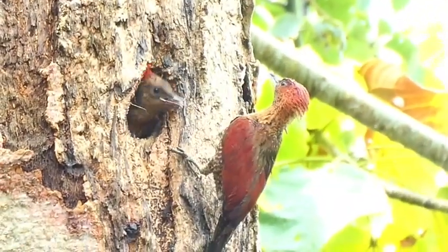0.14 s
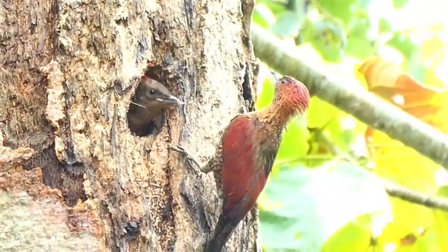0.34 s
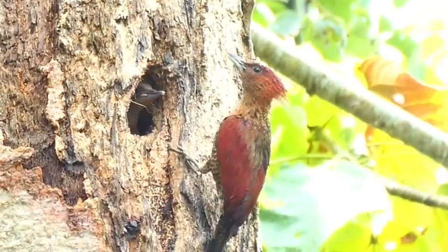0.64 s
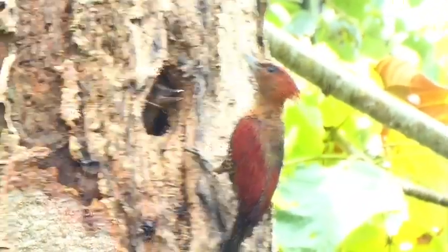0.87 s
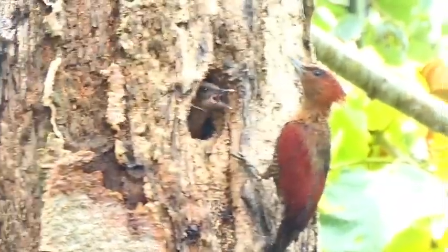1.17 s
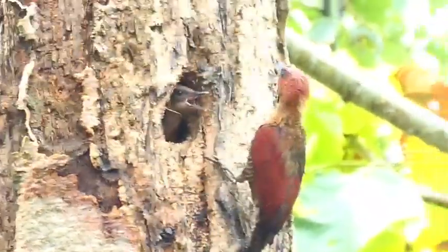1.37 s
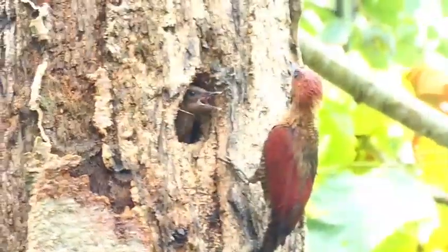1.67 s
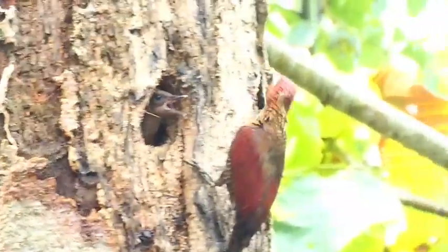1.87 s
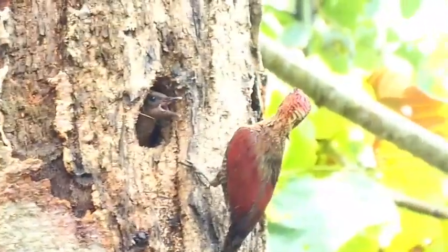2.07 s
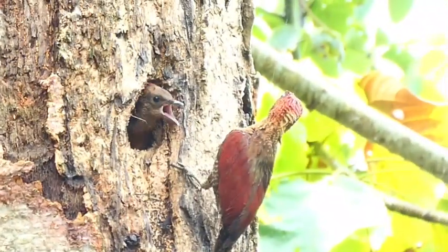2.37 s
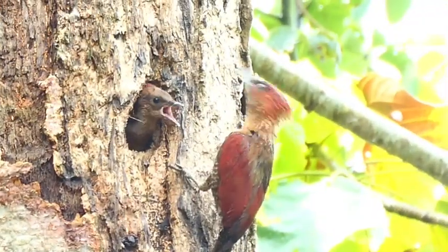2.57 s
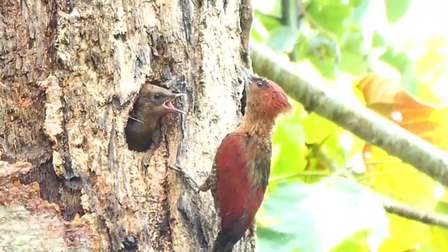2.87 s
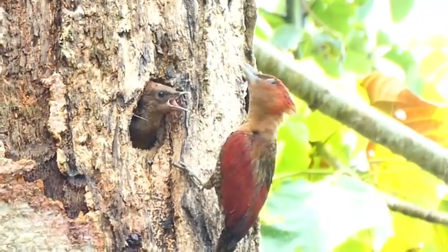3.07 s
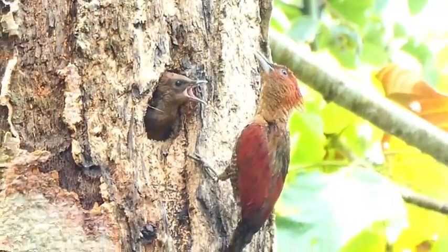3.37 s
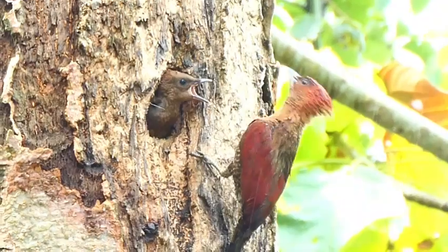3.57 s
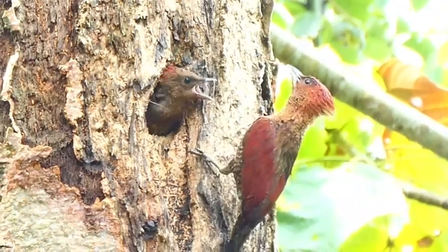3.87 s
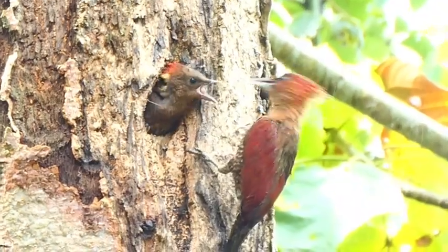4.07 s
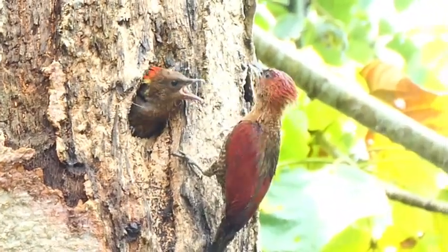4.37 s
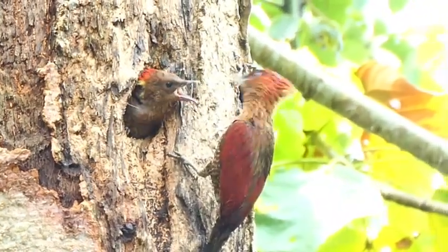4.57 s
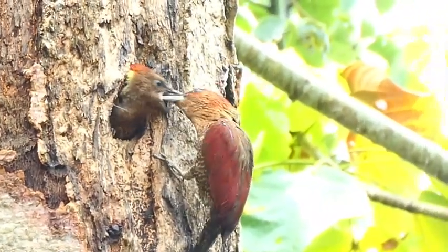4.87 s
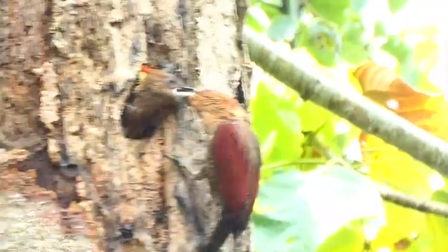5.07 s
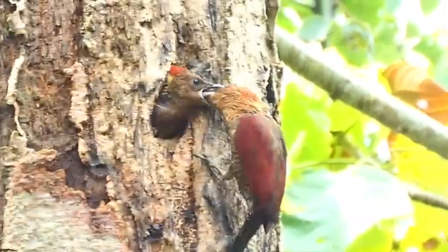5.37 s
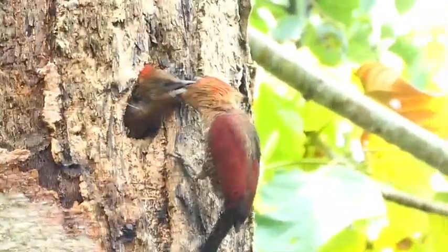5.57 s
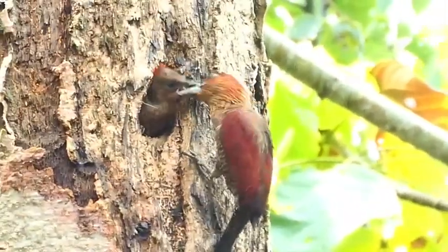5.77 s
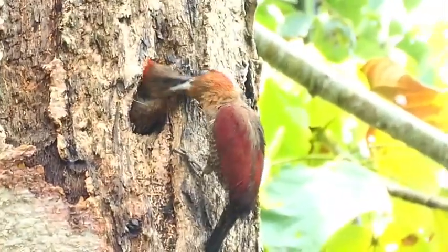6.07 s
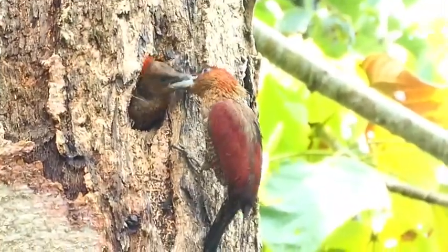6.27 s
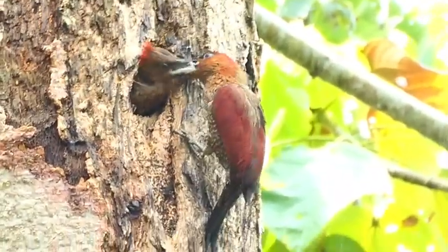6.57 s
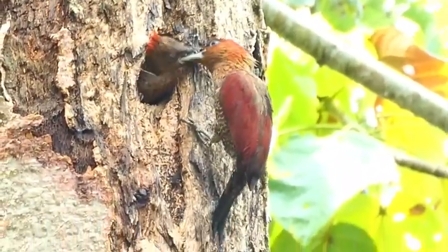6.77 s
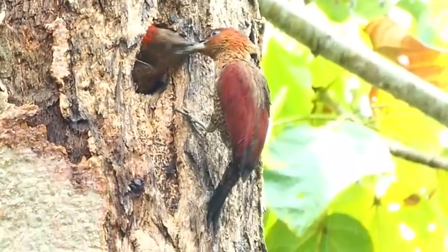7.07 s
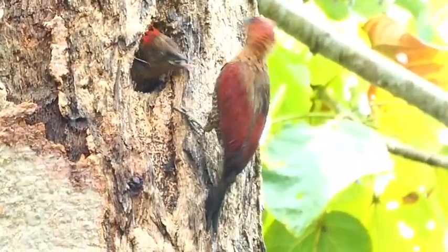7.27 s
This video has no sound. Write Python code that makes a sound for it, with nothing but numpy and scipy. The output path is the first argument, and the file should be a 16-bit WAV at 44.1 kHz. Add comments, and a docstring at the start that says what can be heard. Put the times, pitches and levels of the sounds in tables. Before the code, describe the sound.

Outdoors among trees, a small camera microphone catches a nestling's insistent begging: buzzy, breathy rasps with short clear squeaks, about five per second. Irregular plastic ticks and several bursts of quick gear-like knocking sit very close and dry over the calls. Near the end, the chick is muffled into quicker, rougher rasps and then faint scraps, leaving handling clicks, rattling, soft woodland hum and hiss.

```python
"""A woodpecker nestling begs from its hole: each call is a swelling rasp that often breaks into a clear squeak.
The rasp is noise shaped by throat resonances; the squeak is a gliding tone with overtones.
A camera's focus drive rattles in bursts and its shell ticks, both made of short ringing modes.
Behind them lie echoes from trees, a few soft gliding notes, hum, hiss and a thin insect line, all noise or tones.
The small microphone has a narrow notch and a deep valley in the treble."""
import sys
import numpy as np
from scipy import signal
from scipy.fft import rfft, irfft, next_fast_len
from scipy.io import wavfile
from scipy.ndimage import uniform_filter1d, map_coordinates

SR = 44100
rng = np.random.default_rng(int(sys.argv[2]) if len(sys.argv) > 2 else 0)


def waveform_to_disk(signal):
    """Save audio, clipped to [-1, 1], as 16-bit WAV at the path in sys.argv[1]."""
    frames = np.transpose(np.atleast_2d(signal))
    scaled = np.clip(frames, -1, 1) * 32767
    samples = np.round(scaled).astype(np.int16)
    wavfile.write(sys.argv[1], SR, samples)


N = 327663

# begging calls: peak_s, swell_s, fade_s, rasp_db, sizzle_db
BEGGING_CALLS = [(.045, 0.052, 0.061, -44, -47.5), (.26, 0.13, 0.058, -40.5, -48.5),
                 (0.516, 0.1, 0.043, -30, -39.5), (.665, 0.094, 0.044, -42.5, -42.5),
                 (.89, .12, .05, -35, -37), (1.05, 0.11, 0.048, -40, -42.5),
                 (1.275, 0.15, 0.053, -35.5, -41.5), (1.435, 0.11, 0.06, -33.5, -39),
                 (1.665, .12, 0.058, -33.5, -39), (1.825, 0.11, 0.055, -36.5, -40.5),
                 (2.06, 0.13, 0.042, -37.5, -41), (2.222, 0.14, 0.036, -39, -40),
                 (2.455, 0.13, 0.045, -36.5, -37.5), (2.69, 0.14, 0.06, -38, -36.5),
                 (2.862, 0.13, 0.042, -39, -36), (3.1, 0.13, 0.043, -38.5, -38),
                 (3.27, 0.12, 0.051, -40.5, -37), (3.505, 0.14, 0.063, -37.5, -37.5),
                 (3.68, 0.13, 0.044, -36, -37), (3.915, 0.14, 0.064, -37, -39.5),
                 (4.078, 0.13, 0.058, -38.5, -35), (4.322, 0.14, 0.059, -37, -34),
                 (4.55, 0.14, 0.052, -41.5, -39), (4.715, 0.13, 0.045, -41, -39.5),
                 (4.946, .13, 0.056, -35.5, -40.5), (5.155, 0.093, 0.065, -36.5, -47.5),
                 (5.285, 0.086, 0.05, -37, -44.5), (5.49, 0.091, 0.08, -39, -54),
                 (5.61, 0.075, 0.048, -34.5, -48), (5.715, .06, 0.072, -37.5, -51),
                 (5.915, 0.088, 0.12, -39.5, -46), (6.055, 0.06, 0.036, -39, -42.5),
                 (6.2, 0.091, 0.15, -41, -53), (6.535, 0.033, .04, -55, -47.5),
                 (6.7, 0.11, 0.054, -52, -60), (6.875, 0.058, 0.045, -47.5, -52.5),
                 (7.06, 0.039, .03, -54, -58), (7.2, .1, .2, -62, -59)]
# throat resonances that colour the rasp: centre_hz, width_hz, level_db
THROAT_RESONANCES = [(1998, 157, -2), (2400, 150, -15), (3654, 470, -1), (4436, 333, 2), (5400, 210, -23.5)]
# shape of the bright hiss above the rasp: pitch_hz, level_db (per Hz)
SIZZLE_SPECTRUM = [(6200, -30), (8000, -4.5), (9900, 4), (12500, -3.5), (13600, 4.5), (15500, -15.5)]
# squeaks: start_s, length_s, early_hz, break_hz, end_hz, start_level_db, break_level_db,
# fundamental_db, upper_partials_db (the last two against the octave)
SQUEAK_EVENTS = [(.035, 0.028, 1784, 1730, 1560, -41, -39.5, -6, -12),
                 (0.253, 0.031, 2150, 1930, 1800, -28.5, -33.5, -6, -16),
                 (0.494, 0.036, 2030, 1760, 1730, -31, -22.5, -13, -9.5),
                 (0.631, 0.051, 1780, 1815, 2020, -36, -31.5, -7.5, -10),
                 (0.879, 0.043, 2010, 1810, 1740, -32, -33.5, -8, -7.5),
                 (1.04, 0.025, 1880, 1790, 1640, -44, -25, -15, -7.5),
                 (1.258, 0.032, 1757, 1760, 1700, -29.5, -25, -6.5, -10),
                 (1.43, 0.028, 1930, 1880, 1700, -25.5, -30, -8, -8),
                 (1.646, 0.038, 1795, 1730, 1580, -35, -32.5, 0, -2.5),
                 (1.806, 0.036, 1760, 1800, 1700, -29, -28.5, -5.5, -8.5),
                 (2.038, 0.03, 1850, 1750, 1680, -43, -29.5, -5.5, -2),
                 (2.2, 0.033, 1843, 1805, 1700, -35, -27, -7.5, -7.5),
                 (2.437, 0.04, 1766, 1685, 1800, -36, -34.5, -3, 0.5),
                 (2.669, .041, 1790, 1840, 1570, -34, -28.5, -9.5, -7),
                 (2.848, .036, 1954, 1890, 1500, -30, -33, -15, -1.5),
                 (3.085, 0.034, 1745, 1735, 1680, -32.5, -31.5, -2.5, -4),
                 (3.246, .044, 1965, 1860, 1710, -31.5, -30, -8.5, -3.5),
                 (3.478, 0.056, 1850, 1780, 1670, -36, -29, -14, -5),
                 (3.659, 0.038, 2004, 1920, 1840, -32, -27.5, -10, -5),
                 (3.9, .04, 1922, 1840, 1710, -34.5, -30.5, -18, -5.5),
                 (4.064, 0.031, 1950, 1850, 1830, -29.5, -31, -10.5, -2),
                 (4.311, 0.027, 1873, 1880, 1840, -32, -28.5, -19, 0),
                 (4.54, 0.03, 1833, 1740, 1760, -31.5, -32, -18, -7.5),
                 (4.698, 0.028, 1857, 1830, 1770, -35, -30.5, -13, -6)]
# upper overtones of a squeak: multiple (of the fundamental), level_db
UPPER_PARTIALS = [(3, -4.5), (4, -7), (5, -5.5), (6, -3), (7, -4.5), (8, -10)]
# bursts of the focus drive: first_blow_s, last_blow_s, first_level_db, last_level_db
FOCUS_BURSTS = [(0.889, 1.2, -21, -22.5), (2.889, 3.204, -24, -23.5), (4.568, 4.984, -23, -22),
                (5.475, 6.306, -21.5, -19), (7.168, 7.374, -21, -20)]
# contacts in one turn of the gear: time_from_main_blow_s, level_db
GEAR_CONTACTS = [(-.042, -14), (-.034, -16), (-.025, -10), (-.019, -14), (0, 0), (.006, -9), (.021, -17),
                 (.031, -14), (.041, -17)]
# ringing modes of the lens barrel: pitch_hz, level_db, t60_s (time to fall 60 dB)
BARREL_MODES = [(1111, -1, 0.021), (1205, 1, 0.039), (1615, -1, 0.014), (2008, -6.5, 0.021),
                (2347, -6, 0.02), (3438, -2.5, 0.017), (3940, -7.5, 0.022), (9300, -9, 0.0058),
                (12400, -13, 0.0067)]
# ticks of the shell: start_s, level_db, thud_db, bright_db, crack_db
SHELL_TICKS = [(0.4716, -36.5, 0, 0, -4), (0.5302, -26, -6, 4, -6), (0.5755, -32, -22, -5, -18),
               (0.622, -33.5, -4, -5, -10), (0.6875, -36.5, -2, 10, -15), (0.7567, -31, -13, 1, -15),
               (0.9464, -22, -12, -2, -16), (0.9677, -43, -23, -4, -24), (1.1629, -23.5, -7.5, 8, -22),
               (1.3184, -27.5, -14, 4, -20), (1.3705, -19, -8.5, 3, -25), (1.4667, -32, -8, 6, -14),
               (1.5598, -30, -7, 7, -13), (1.8648, -24.5, -1.5, -17, -11), (2.0191, -30, -9, 1, -9),
               (2.2079, -27.5, -11, -16, -7), (2.3038, -22, -6.5, -18, -9.5), (2.6165, -29.5, -13, -3, -9),
               (3.2141, -30.5, 1.5, 5, -15), (3.3543, -41, -7, 10, -6), (3.6259, -32.5, -15, 1, -9),
               (4.1918, -30, -3, -20, -25.5), (4.266, -31, -6.5, -8, -31), (4.3898, -32.5, -9, 2, -12),
               (4.799, -21, -8, 6, -26), (5.1346, -30.5, -8, 4, -7), (6.0716, -23, -16, 2, -7.5),
               (6.346, -16, -1.5, 8, -10), (6.3966, -34, -15, 9, -15), (6.5933, -36, -8, 10, -16),
               (6.783, -37, -7, 1, -21), (6.836, -37.5, -4, -9, -16), (6.9406, -35, -15, -13, -16),
               (7.207, -26, -11, -6, -29), (7.3268, -16.5, -11.5, 2.5, -24)]
# ringing modes of the shell: pitch_hz, level_db, t60_s
SHELL_MODES = [(312, -16, 0.019), (473, -8, 0.033), (734, 10, 0.0084), (1006, 9.5, 0.0093),
               (1430, 6, 0.0038), (1830, 8, 0.0041), (2720, 0.5, 0.0063), (3120, -11, 0.016),
               (3870, -6, 0.0082), (10100, 1, 0.0072), (11800, 8.5, 0.0034)]
# soft far notes: start_s, length_s, first_hz, last_hz, level_db, octave_db
FAR_NOTES = [(0, .11, 954, 888, -42.5, -6.5), (2.706, 0.095, 347, 334, -52, -18),
             (3.35, 0.017, 2530, 2480, -40, -26), (4.374, 0.019, 480, 415, -37, -6),
             (4.409, 0.036, 522, 355, -45.5, 4), (4.438, 0.026, 1020, 900, -46, -6),
             (4.445, 0.048, 1560, 1500, -48.5, -18), (4.43, 0.065, 1980, 1920, -50.5, -18),
             (5.61, 0.124, 366.3, 420, -46, -5), (6.524, 0.042, 3490, 3640, -46, -44),
             (6.837, 0.034, 993, 957, -41, -12)]
# shape of the far hum and hiss: pitch_hz, level_db (per Hz)
GROVE_SPECTRUM = [(30, -2), (65, -7.5), (100, -0.5), (400, -1.5), (950, 0.5), (1500, -11), (2300, -9.5),
                  (3800, -10), (5000, -36), (9000, -22.5), (12000, -18.5), (15500, -33)]
# loudness of the hum and hiss over time: time_s, level_db
HUM_LEVEL = [(0.0, -43), (0.25, -44.5), (1.01, -44), (4.03, -46), (4.65, -43.5), (5.44, -45.5),
             (5.67, -42.5), (6.08, -42.5), (6.56, -44.5), (7.43, -43)]
# how alike the left and right noise are: pitch_hz, likeness (1 = the same)
SIDE_LIKENESS = [(30, 0.98), (100, 0.99), (1000, 1), (6000, 1), (8000, 0.36), (15000, 0.91)]
# how long the echoes among the trees last: pitch_hz, t60_s
TREE_DECAY = [(300, .3), (3000, 0.17), (12000, 0.15)]
# tone colour of the microphone port: pitch_hz, gain_db
PORT_GAIN = [(30, -25), (100, -1), (4600, 2), (5300, -3), (6000, -12), (6900, -14), (7900, -9.5),
             (9000, -4.5), (10000, 0.5)]
# how strongly the two ports differ: pitch_hz, level_db
PORT_MISMATCH = [(30, -13), (100, -21), (500, -26), (1000, -31), (4000, -27), (7000, -20), (9000, -12),
                 (15000, -13)]

# powers of the swell and fade: the sizzle peaks more sharply than the rasp
RASP_RISE, RASP_FALL, SIZZLE_RISE, SIZZLE_FALL = 0.99, 1.26, 1.31, 1.4
FLUTTER_DB, SIZZLE_FLUTTERS = 2.1, 0.6  # depth of the fast flutter; the sizzle's share of all flutter
# rasp and sizzle give way while a squeak sounds, with ramps this long
DUCK_DB, SIZZLE_DUCK_DB, DUCK_S = -14.5, -2, 0.0096
HELD_AT, DROP_TAKES = 0.68, 0.31  # share of the squeak where the break comes; share the bend takes
RISE, RISE_TAKES = 0.045, 0.13  # share of pitch to climb at the start; share of length setting its pace
AFTER_DB = -0.5  # level change from the break to the end of a squeak
TURN_S = 0.104  # about one turn of the gear
BLOW_DB, WHIRR_DB = -4, -28  # main blow and whirr, against the burst's level
INSECTS_DB = -69
TOP_HZ = 15700  # nothing passes the microphone above this


def amp(db):
    """Turn decibels into a plain multiplier."""
    return 10 ** (np.asarray(db) / 20)


def unit(x):
    """Scale to an rms (average strength) of 1."""
    return x / np.sqrt(np.mean(x ** 2) + 1e-20)


def along(points, hz):
    """Read a curve of (hz, value) points on a log pitch axis."""
    f, v = np.transpose(points)
    return np.interp(np.log(hz + 1), np.log(f + 1), v)


def curves(rows):
    """One value per sample for each column after the time."""
    s, *cols = np.transpose(rows)
    return [np.interp(np.arange(N) / SR, s, c) for c in cols]


def wobble(rate, size=N):
    """A smooth random curve through so many random points a second."""
    knots = rng.standard_normal(int(size * rate / SR) + 4)
    return map_coordinates(knots, [np.arange(size) * rate / SR])


def filtered(x, response):
    """Shape a sound by a gain that depends on frequency."""
    m = next_fast_len(N + SR // 2)
    return irfft(rfft(x, m) * response(np.fft.rfftfreq(m, 1 / SR)), m)[..., :N]


def add(track, s, sound):
    """Mix a sound into the track from time s."""
    part = track[max(round(s * SR), 0):][:len(sound)]
    part += sound[:len(part)]


def rush(gain, patchy_db):
    """Stereo noise of rms 1 with patches of random gain; its sides are as alike as the table says."""
    z = signal.stft(rng.standard_normal((2, N)), nperseg=256)[2]
    patches = rng.standard_normal(z.shape[1:])
    patches = uniform_filter1d(uniform_filter1d(patches, 3, 0), 8, 1)
    pair = signal.istft(z * amp(patchy_db * unit(patches)), nperseg=256)[1][:, :N]

    def spread(hz):
        angle = np.arccos(np.clip(along(SIDE_LIKENESS, hz), -1, 1)) / 2
        return gain(hz) * [np.cos(angle), np.sin(angle)]

    mid, side = filtered(pair, spread)
    return unit(np.array([mid + side, mid - side]))


def ring(modes, extra_db, scatter_db, turns, attack):
    """Fading sine modes with random strengths; their phases scatter by up to so many turns."""
    t = np.arange(SR // 24) / SR
    hz, db, t60 = (np.array(modes)[:, k, None] for k in range(3))
    level_db = db + extra_db + scatter_db * rng.standard_normal(hz.shape) - 60 * t / t60
    waves = np.sin(2 * np.pi * (hz * t + turns * rng.random(hz.shape)))
    return (amp(level_db) * waves).sum(0) * (1 - np.exp(-t / attack))


def rasp():
    """Turbulent breath in the throat's resonances, fluttering fast, with a sizzle above."""
    effort, sizzle, locked = np.zeros((3, N))
    for s, swell, fade, rasp_db, sizzle_db in BEGGING_CALLS:
        start = max(s - swell, 0)
        t = np.arange(start - s, fade, 1 / SR)  # time from the peak
        up = np.clip(1 + t / swell, 0, 1)
        down = np.clip(1 - t / fade, 0, 1)
        add(effort, start, amp(rasp_db) * up ** RASP_RISE * down ** RASP_FALL)
        add(sizzle, start, amp(sizzle_db) * up ** SIZZLE_RISE * down ** SIZZLE_FALL)
    for s, length, *_ in SQUEAK_EVENTS:
        t = np.arange(0, length, 1 / SR)
        add(locked, s, np.clip(np.minimum(t, length - t) / DUCK_S, 0, 1))

    def throat(f):
        power = sum(amp(2 * g) / (1 + (2 * (f - c) / w) ** 2) ** 1.075 for c, w, g in THROAT_RESONANCES)
        return np.sqrt(power)

    flutter_db = FLUTTER_DB * wobble(300) + wobble(40)
    hoarse = rush(throat, patchy_db=2.5)
    hiss = rush(lambda f: amp(along(SIZZLE_SPECTRUM, f)), patchy_db=2.5)
    rasp_gain = effort * amp(flutter_db + DUCK_DB * locked)
    sizzle_gain = sizzle * amp(SIZZLE_FLUTTERS * flutter_db + SIZZLE_DUCK_DB * locked)
    return rasp_gain * hoarse + sizzle_gain * hiss


def squeaks():
    """The syrinx (voice organ) locks into a vibration; its pitch climbs in, then breaks and bends off."""
    out = np.zeros(N)
    for (s, length, early_hz, break_hz, end_hz,
         first_db, break_db, low_db, high_db) in SQUEAK_EVENTS:
        u = np.linspace(0, 1, round(length * SR))  # share of the squeak gone by
        n = len(u)
        shake = 0.0048 * wobble(285, size=n) + 0.0017 * wobble(1430, size=n)
        bend = (end_hz - break_hz) * np.clip((u - HELD_AT) / DROP_TAKES, 0, 1) ** 1.18
        path_hz = np.interp(u, [0, HELD_AT], [early_hz, break_hz]) + bend
        hz = path_hz * (1 + shake - RISE * np.exp(-u / RISE_TAKES))
        phase = 2 * np.pi * np.cumsum(hz) / SR
        upper = np.zeros(n)
        for k, g in UPPER_PARTIALS:
            upper += amp(g + 3.14 * wobble(400, size=n)) * np.sin(k * phase + 6 * rng.random())
        # the fundamental gains as the pitch sinks
        low = amp(low_db + 0.055 * (hz.mean() - hz)) * np.sin(phase)
        tone = low + np.sin(2 * phase) + amp(high_db) * upper
        # a brief dip halfway through the bend
        dip = 1 - 0.6 * np.exp(-((u - HELD_AT - DROP_TAKES / 2) / 0.035) ** 2)
        level_db = np.interp(u, [0, HELD_AT, 1], [first_db, break_db, break_db + AFTER_DB])
        shape = amp(level_db + 2.06 * wobble(276, size=n) + wobble(60, size=n))
        edges = np.clip(5 * np.minimum(u, 1.6 * (1 - u)), 0, 1)
        add(out, s, shape * dip * edges * tone)
    return out


def focus():
    """Each turn of the gear knocks the lens barrel in one pattern, over a whirr in the same modes."""
    out, load, hz = np.zeros(N), np.zeros(N), np.array(BARREL_MODES)[:, :1]
    for first, last, first_db, last_db in FOCUS_BURSTS:
        turns = round((last - first) / TURN_S) + 1
        for s, db in np.linspace([first, first_db], [last, last_db], turns):
            for lag, contact_db in GEAR_CONTACTS:
                if lag:  # the lesser contacts are soft and vary
                    knock = ring(BARREL_MODES, db + contact_db, scatter_db=3.5, turns=0.88, attack=0.00028)
                    add(out, s + lag + 0.00081 * rng.standard_normal(), knock)
                else:  # the main blow is bright and repeats closely
                    blow_db = db + BLOW_DB + 3.6 * (hz > 1400)
                    blow = ring(BARREL_MODES, blow_db, scatter_db=1.2, turns=0.15, attack=0.00044)
                    add(out, s, blow)
            load[round((s - 0.05) * SR):round((s + 0.055) * SR)] = amp(db)

    def barrel(f):
        return sum(amp(db) * f * (4 / t60) / abs(c * c - f * f + 1j * f * 4 / t60)
                   for c, db, t60 in BARREL_MODES)

    whirr = unit(filtered(rng.standard_normal(N) * amp(4 * wobble(250)), barrel))
    return out + amp(WHIRR_DB) * uniform_filter1d(load, size=400) * whirr


def ticks():
    """Dry ticks of the shell: dull thud, brighter modes and a brief crack, mixed anew each time."""
    out, hz = np.zeros(N), np.array(SHELL_MODES)[:, :1]
    for s, db, thud_db, bright_db, crack_db in SHELL_TICKS:
        # modes between 1200 and 2200 Hz keep the plain level
        mix_db = db + np.select([hz < 1200, hz > 8000, hz > 2200], [thud_db, crack_db, bright_db])
        add(out, s, ring(SHELL_MODES, mix_db, scatter_db=1, turns=0.12, attack=0.00025))
    return out


def far_notes():
    """Brief, slightly rough gliding tones, each with its octave."""
    out = np.zeros(N)
    for s, length, first_hz, last_hz, db, octave_db in FAR_NOTES:
        u = np.linspace(0, 1, round(length * SR))
        hz = first_hz + (last_hz - first_hz) * u + 25 * wobble(235, size=len(u))
        phase = 2 * np.pi * np.cumsum(hz) / SR
        rough = amp(4 * wobble(180, size=len(u)))
        swell = np.sin(np.pi * u) ** 0.5
        tone = np.sin(phase) + amp(octave_db) * np.sin(2 * phase)
        add(out, s, np.sqrt(2) * amp(db) * rough * swell * tone)
    return out


def trees(x):
    """Echoes from the trunks around: a noise tail in which each frequency dies at its own speed."""
    hz, t, z = signal.stft(rng.standard_normal((2, SR // 2)), SR, nperseg=256)
    fade = amp(-60 * t / along(TREE_DECAY, hz)[:, None])
    mid, side = signal.istft(z * fade, SR, nperseg=256)[1]
    side = filtered(side, lambda f: np.sqrt(1 - np.clip(along(SIDE_LIKENESS, f), 0, 1)))
    tail = mid + side[:len(mid)] * [[1], [-1]]
    late = np.pad(x, (300, 0))[None]  # the echoes start 300 samples later
    return signal.fftconvolve(late, tail / np.linalg.norm(tail[0]), axes=1)[:, :N]


def grove():
    """Far hum and hiss as shaped noise, and a thin insect line as a narrow band of noise."""
    insects = rush(lambda f: 1 / (1 + ((f - 12200) / 150) ** 2), patchy_db=3)
    hum = rush(lambda f: amp(along(GROVE_SPECTRUM, f)), patchy_db=2.5)
    return amp(curves(HUM_LEVEL)[0]) * hum + amp(INSECTS_DB) * insects


def scene():
    """Add up all sources; the calls and far notes also echo from the trees."""
    hoarse, clear, far = rasp(), squeaks(), far_notes()
    echoes = amp(-7.5) * trees(clear + hoarse.mean(0) + far)
    return clear + hoarse + echoes + far + focus() + ticks() + grove()


def record(dry):
    """Microphone: port valley, narrow notch, two ports that colour a little differently, band limit."""
    t = np.arange(SR // 20) / SR
    paths = rng.standard_normal(SR // 20) * amp(-60 * t / 0.06)
    unlike = signal.fftconvolve(dry.mean(0), paths / np.linalg.norm(paths))[:N]
    ports = dry + filtered(unlike, lambda f: amp(along(PORT_MISMATCH, f))) * [[1], [-1]]

    def response(f):
        rest = 9e6 - f * f  # zero at the notch, 3000 Hz
        notch = (rest + 1j * f * 40) / (rest + 1j * f * 330)
        lean = amp(0.5 * (f > 8000) * np.array([[1], [-1]]))  # left a little brighter than right
        return amp(along(PORT_GAIN, f)) * notch * lean * (f < TOP_HZ)

    return filtered(ports, response)


dry = scene()
out = record(dry)
waveform_to_disk(out)
```